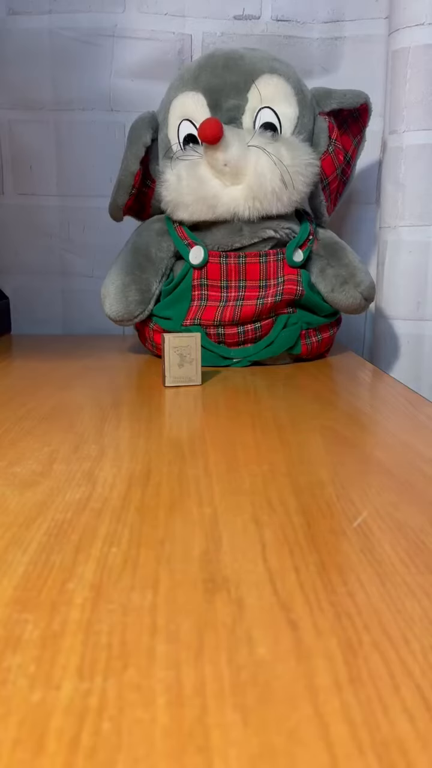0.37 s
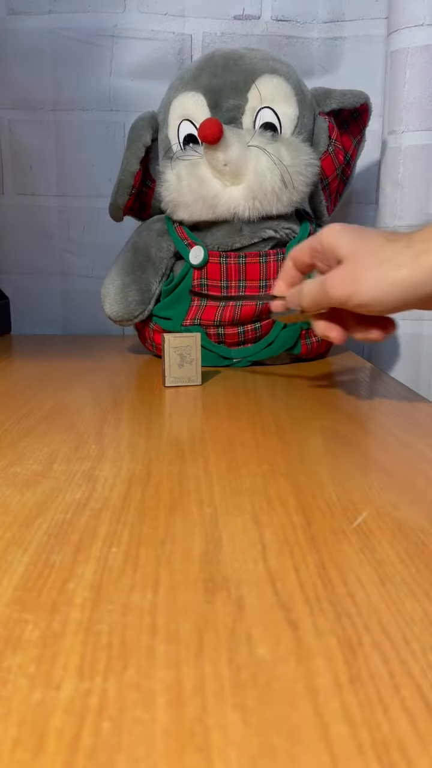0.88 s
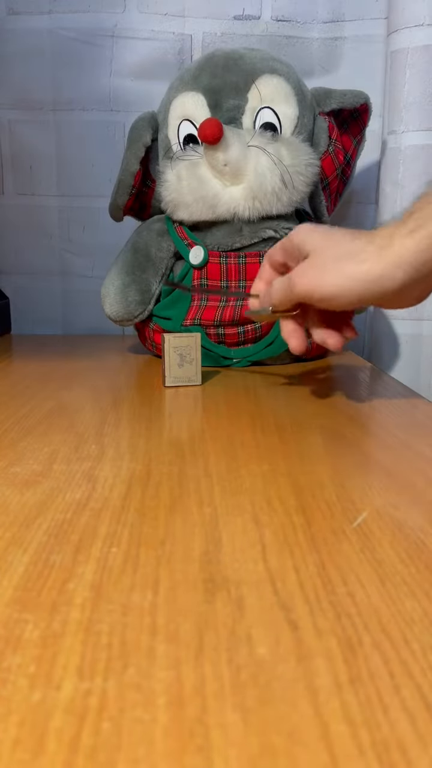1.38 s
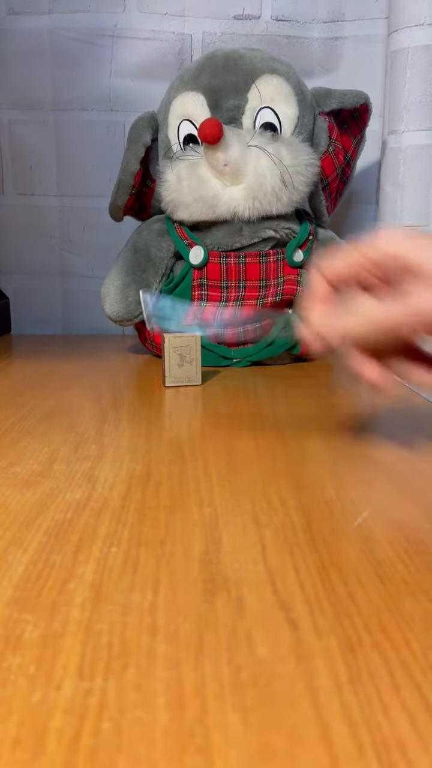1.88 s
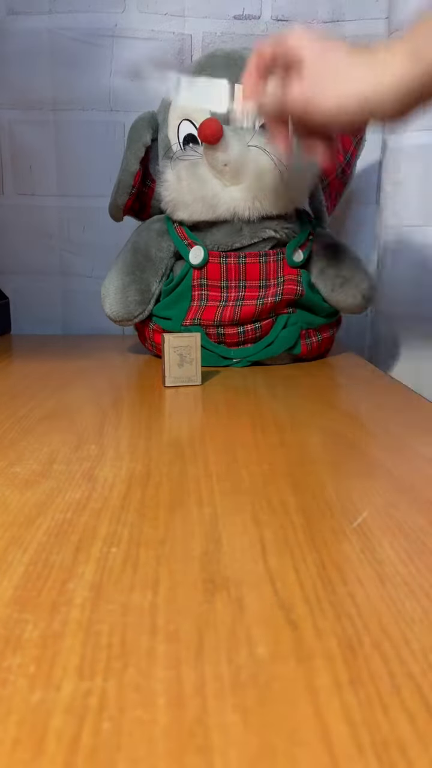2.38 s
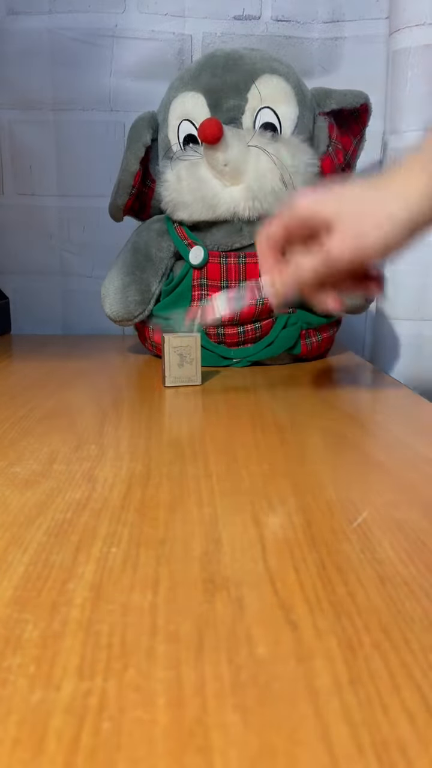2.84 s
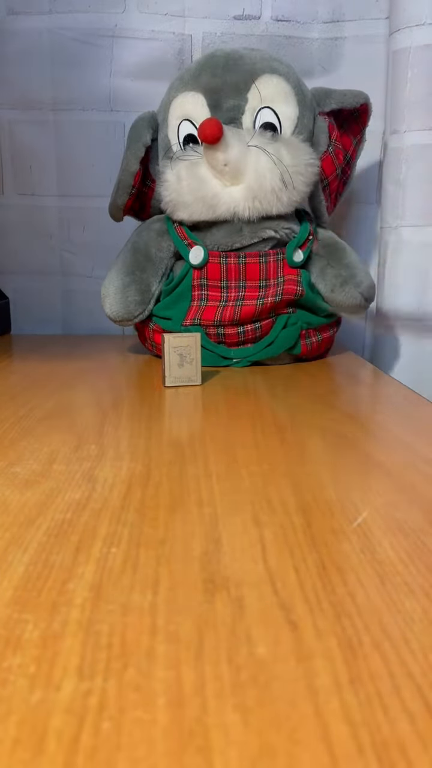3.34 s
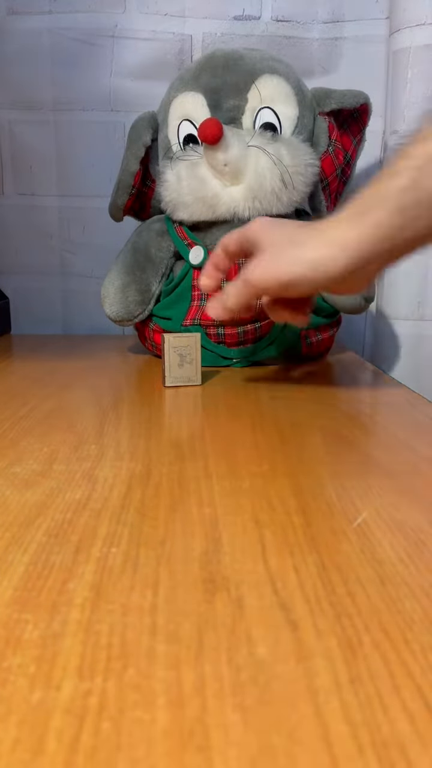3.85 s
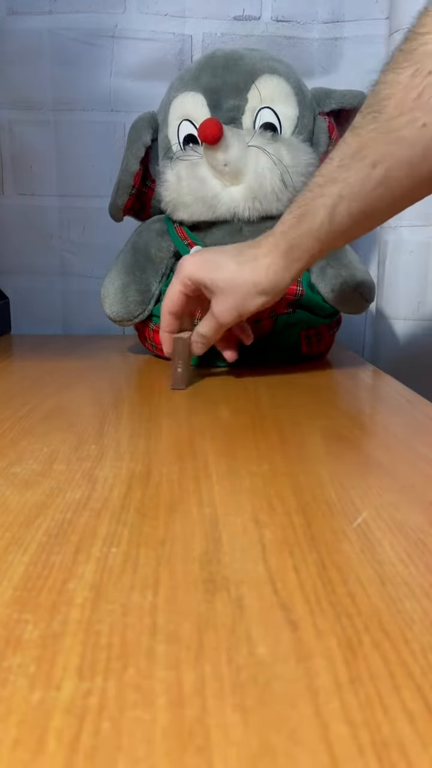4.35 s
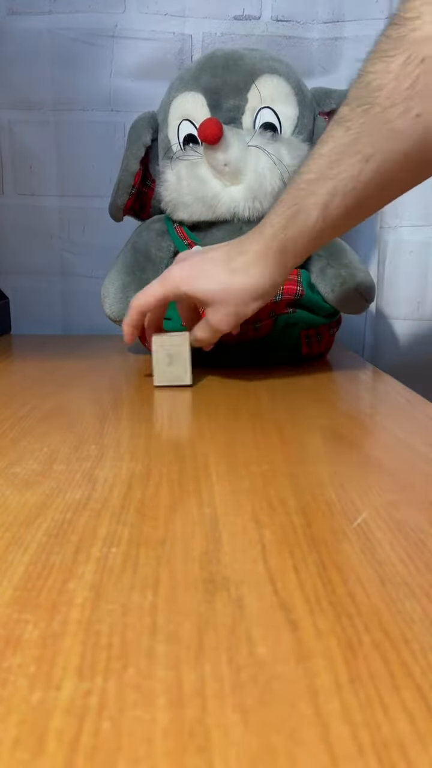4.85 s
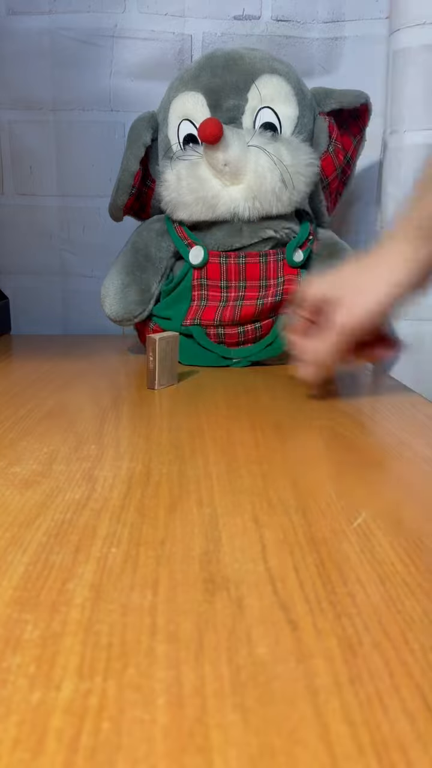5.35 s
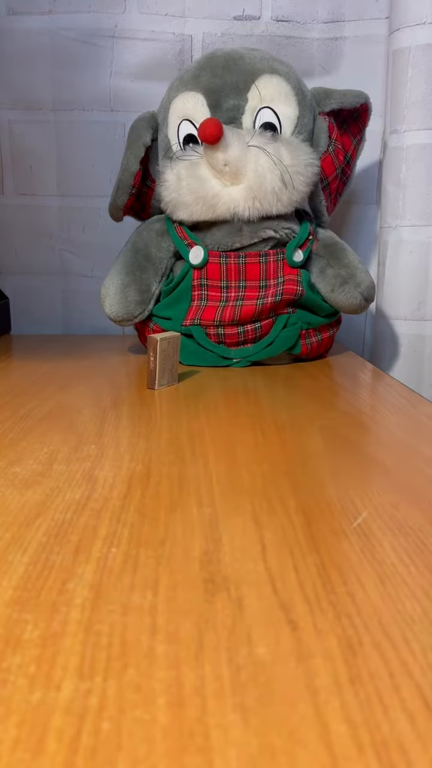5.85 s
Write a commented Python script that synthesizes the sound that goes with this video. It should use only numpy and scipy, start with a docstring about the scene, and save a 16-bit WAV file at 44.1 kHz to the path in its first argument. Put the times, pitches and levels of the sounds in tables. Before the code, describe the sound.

Small hard objects touch a varnished tabletop, heard close and nearly dry in stereo. Muffled arm bumps and faint sleeve rustling surround separate sharp clicks with short woody ringing. The loudest are around two and four seconds. A small block is then knocked, scuffed and slid round, set down with faint clicks and a last low tap. Steady quiet low hum and room noise lie beneath.

```python
"""Small hard objects tapped, dropped and slid by hand on a wooden tabletop in a quiet room, near a phone.
Taps: falling click, ringing wood modes, noise crackle and treble, dull knock, tabletop boom.
Slides: unevenly gated noise through the wood modes; scuffs: noise in one resonance; thuds: boom alone.
Sleeve: fluctuating filtered noise. Background: wavering mains lines over patchy room noise."""
import sys
import numpy as np
from scipy import signal
from scipy.fft import rfft, irfft, next_fast_len
from scipy.io import wavfile
from scipy.ndimage import uniform_filter1d, map_coordinates

SR = 44100
rng = np.random.default_rng(int(sys.argv[2]) if len(sys.argv) > 2 else 0)


def elevation(decibels):
    """Turn decibel levels (scalar or array-like) into linear amplitude ratios."""
    levels = np.asarray(decibels, float)
    return 10 ** (levels / 20)


def inscribe(sig):
    """Save sig as 16-bit PCM at rate SR to the path in sys.argv[1].

    A 1-D sig is mono; a 2-D sig holds one channel per row.
    Samples are clipped to [-1, 1] before scaling.
    """
    pcm = np.round(np.clip(np.atleast_2d(sig).T, -1, 1) * 32767)
    wavfile.write(sys.argv[1], SR, pcm.astype(np.int16))


N = 274213


def unit(x):
    """Scaled to rms 1."""
    return x / np.sqrt(np.mean(x ** 2) + 1e-20)


def along(points, hz):
    """Interpolates (Hz, value) points on a log frequency axis."""
    f, v = np.transpose(points)
    return np.interp(np.log(hz + 1), np.log(f + 1), v)


def wobble(knots_per_s):
    """Smooth random curve."""
    knots = rng.standard_normal(int(N * knots_per_s / SR) + 4)
    return map_coordinates(knots, [np.arange(N) * knots_per_s / SR])


def filtered(x, response):
    """Multiplies the spectrum of x by a complex response of frequency."""
    n = x.shape[-1]
    m = next_fast_len(n + 8192)
    return irfft(rfft(x, m) * response(np.fft.rfftfreq(m, 1 / SR)), m)[..., :n]


# likeness of diffuse sound at the two ports: f/Hz, correlation
PORT_LIKENESS = [(60, 1), (150, .93), (400, 0.26), (1200, 0.29), (3000, 0.1), (4000, 0.17), (4600, 0.88),
                 (11000, 1), (12000, 0.87)]


def spread(pair):
    """Mixes two unrelated signals as mid and side to the likeness of diffuse sound."""
    def mid_side(hz):
        angle = np.arccos(np.clip(along(PORT_LIKENESS, hz), 0, 1)) / 2
        return np.array([np.cos(angle), np.sin(angle)])

    mid, side = filtered(pair, mid_side)
    return np.array([mid + side, mid - side])


def rush(spectrum, n=N):
    """Diffuse stereo noise of rms 1 with the given spectrum."""
    noise = rng.standard_normal((2, n))
    return unit(spread(filtered(noise, lambda hz: elevation(along(spectrum, hz)))))


def add(out, start, sound):
    """Mixes a sound in at a sample."""
    out[:, start:start + sound.shape[1]] += sound


# room decay: f/Hz, t60/s
ROOM_DECAY = [(200, 0.11), (1500, 0.13), (5000, 0.24), (11000, 0.074)]


def room(x):
    """Reverberation: each frequency dies at its own speed; each call draws another answer."""
    predelay_samples = 300
    hz, t, z = signal.stft(rng.standard_normal((2, SR // 3)), SR, nperseg=256)
    decay = elevation(-60 * t / along(ROOM_DECAY, hz)[:, None])
    tail = spread(signal.istft(z * decay, SR, nperseg=256)[1])
    tail = tail / np.linalg.norm(tail[0])
    return signal.fftconvolve(np.pad(x, (predelay_samples, 0))[None], tail, axes=1)[:, :len(x)]


def movements(rows):
    """Gains of overlapping movements that swell and fade: the whole, and the part set by the last column."""
    edge_db = 23.5  # below peak at the start and after the fade time
    start, swell, fade, db, part_db = np.transpose(rows)[:, :, None]
    t = np.arange(N) / SR - start - swell
    gain = elevation(db - edge_db * np.where(t < 0, -t / swell, t / fade)) * (t > -swell)
    part = gain * elevation(part_db)
    return np.sqrt(np.sum(gain ** 2, axis=0)), np.sqrt(np.sum(part ** 2, axis=0))


# mains lines: f/Hz, level/dB rms
MAINS_LINES = [(50, -73.5), (100, -65), (120, -70.5), (200, -70), (250, -70.5), (450, -81.5), (650, -84),
               (750, -89.5)]
# room noise spectrum: f/Hz, relative density/dB
ROOM_NOISE = [(20, -23), (55, -4.5), (130, -8.5), (300, -17), (550, -26.5), (1000, -34), (2000, -37),
              (4000, -42.5), (7000, -44.5), (9500, -42), (11000, -53.5), (12000, -79.5)]


def background():
    """Mains lines wavering in level and phase, over noise whose level varies in time-frequency patches."""
    t = np.arange(N) / SR
    hum = 0
    for hz, db in MAINS_LINES:
        level = np.sqrt(2) * elevation(db + 0.98 * wobble(5.8))
        hum = hum + level * np.sin(2 * np.pi * (hz * t + rng.uniform()) + .5 * wobble(37))
    z = signal.stft(rush(ROOM_NOISE), nperseg=1024)[2]
    patches = rng.standard_normal(z.shape[1:])
    for axis in (0, 1):
        patches = uniform_filter1d(patches, size=5, axis=axis)
    noise = signal.istft(z * elevation(3 * unit(patches)), nperseg=1024)[1][:, :N]
    return hum + elevation(-65) * noise


# arm movements: start t/s, swell/s, fade/s, rustle level/dB, body re rustle/dB (before layer gains)
ARM_MOVES = [(-.1, 0.11, 0.23, -82.5, 10), (.15, 0.13, 0.22, -77.5, -22), (.3, 0.087, 0.039, -75.5, -25),
             (.48, 0.071, 0.25, -87.5, 4), (.45, 0.21, 0.22, -112.5, 39.5), (.68, 0.082, 0.1, -83.5, 6),
             (1.3, .09, 0.11, -81, -3), (1.55, 0.074, 0.083, -80, -17), (1.72, 0.091, 0.8, -79.5, 2.5),
             (1.78, 0.15, 0.18, -78.5, 7.5), (3.05, 0.074, 0.072, -79, 0), (3.47, 0.098, 0.034, -61.5, -25),
             (3.56, 0.047, 0.054, -88, 21.5), (3.64, 0.075, 0.088, -76, -2), (6.1, .1, .1, -83, 10.5)]
# cloth rustle spectrum: f/Hz, relative density/dB
CLOTH_SPECTRUM = [(4500, -40.5), (6000, -17), (8000, -5.5), (10000, 7.5), (11000, -10.5), (11800, -41)]
# body spectrum, also of tap crackle, scuffs and rub: f/Hz, relative density/dB
WOOD_SPECTRUM = [(200, -7.5), (450, -8), (1000, 0.5), (2000, 0), (3500, -6.5), (5000, -6.5), (12500, -55)]


def sleeve():
    """Cloth brushes on cloth as the arm moves: treble and body noise under one random fluctuation."""
    treble, body = movements(ARM_MOVES)
    folds = unit(elevation(2.3 * wobble(58)))
    rustle = elevation(12.5) * treble * rush(CLOTH_SPECTRUM)
    return folds * (rustle + elevation(4.0) * body * rush(WOOD_SPECTRUM))


# tabletop modes: f/Hz, level/dB, t60/s
TABLETOP_MODES = [(65.4, -2.5, 0.17), (118, -5, 0.22), (193.1, -1.5, .17), (256, -4.5, .12),
                  (314, -14.5, 0.054), (366, -12.5, 0.081), (415, -17, 0.092), (550, -21, 0.057)]


def boom(t, upper_db, rise_s):
    """Decaying tabletop modes swell together, a little unlike at each port; upper_db weights those above 150 Hz."""
    modes = 0
    for hz, db, t60 in TABLETOP_MODES:
        port_db = rng.normal(0, 1.2, (2, 1))
        mode_db = db + rng.normal(0, 1.5) + port_db + upper_db * (hz > 150)
        modes = modes + elevation(mode_db - 60 * t / t60) * np.sin(2 * np.pi * hz * t)
    return modes * (1 - np.exp(-(t / rise_s) ** 2))


# soft pushes of arm and hand: t/s, level/dB (before layer gain), upper modes/dB
SOFT_PUSHES = [(0.086, -48, -13), (0.362, -55, -19), (0.66, -61, 9), (0.762, -43.5, -31),
               (0.849, -49.5, -15), (1.406, -45.5, -25), (1.588, -45.5, -14), (1.779, -43.5, -7.5),
               (2.369, -56, -0.5), (3.677, -36, -2.5), (4.68, -62, 2)]


def thuds():
    """Soft flesh loads the tabletop slowly: boom alone."""
    out, t = np.zeros((2, N + SR)), np.arange(SR // 3) / SR
    for s, db, upper_db in SOFT_PUSHES:
        add(out, round(s * SR), elevation(db + 4.5) * boom(t, upper_db, rise_s=0.0125))
    return out[:, :N]


# sharp contacts: t/s, level/dB, click f/Hz, treble/dB, boom/dB (levels before layer gains)
CONTACTS = [(1.065, -30.5, 1630, -47, -10.5), (1.2209, -19.5, 1634, -23.5, -12.5),
            (1.291, -49.5, 2420, -26, -20.5), (2.139, -4, 2645, -16, -30), (2.174, -24.5, 2200, -23.5, -17),
            (2.9204, -12, 2230, -16.5, -25.5), (2.926, -23, 2370, -20, -14.5),
            (3.998, -10, 1403, -24.5, -20.5), (4.0026, -4.5, 919, -32, -14.5),
            (4.0127, -10, 1507, -21, -23.5), (4.017, -3.5, 1890, -38.5, -28),
            (4.106, -31, 1504, -22.5, -19), (4.128, -30.5, 1640, -22.5, -30.5),
            (4.39, -21, 1007, -6.5, -14), (4.434, -10.5, 900, -12.5, -19), (4.89, -46, 1870, -18, -9.5),
            (4.93, -40, 2310, -4.5, -24), (5.3881, -28, 2310, -20, 10.5)]
# treble of tap and rub: f/Hz, relative density/dB
FIZZ_SPECTRUM = [(1800, -27.5), (3200, 1), (5000, 1), (7000, -2), (9000, 3.5), (10500, 1.5), (11300, -12.5),
                 (12000, -47.5)]
# dull knock and drag: f/Hz, relative density/dB
DULL_SPECTRUM = [(150, -12.5), (350, 1), (900, -9), (1400, -16), (3000, -62.5)]
# upper modes of the wood: f/Hz, level/dB, t60/s
WOOD_MODES = [(635, -0.5, 0.08), (900, 0.5, 0.12), (944, -1.5, 0.087), (1280, -4, 0.031), (1547, -8, 0.18),
              (1767, -2, 0.054), (1995, -9, 0.12), (2200, -3, 0.045), (2676, -5, 0.019),
              (3261, -11, 0.0063), (4120, -12, 0.029)]


def taps():
    """A falling few-cycle click rings wood modes near its pitch; crackle, late dull knock and boom follow."""
    out, t = np.zeros((2, N + SR)), np.arange(SR // 3) / SR
    mode_hz, mode_db, mode_t60 = np.transpose(WOOD_MODES)[:, :, None]
    for s, db, hz, treble_db, boom_db in CONTACTS:
        def near_db(f):
            return -9 * np.log2(f / hz) ** 2

        # 10 cycles to -60 dB at -26 dB level and -24.5 dB treble; louder or brighter is shorter
        click_t60 = 10 / hz * np.exp(-0.015 * (db + 26) - 0.03 * (treble_db + 24.5))
        fall = hz * (t + 0.0001 * (1 - np.exp(-t / 0.00033)))  # the contact softens as it lets go
        click = elevation(7.5 - 60 * t / click_t60) * np.sin(2 * np.pi * fall) * (1 - np.exp(-t / 0.0004))

        # each blow weights the modes anew
        level_chance, phase_chance = rng.standard_normal((2, 2, len(mode_hz), 1))
        ring_db = mode_db + 2.3 * near_db(mode_hz) + 3.5 * level_chance - 60 * t / mode_t60
        ring = np.sum(elevation(ring_db) * np.sin(2 * np.pi * mode_hz * t + 3.9 * phase_chance), axis=1)

        crackle = filtered(rush(WOOD_SPECTRUM, len(t)), lambda f: elevation(0.27 * near_db(f + 1)))
        crackle = elevation(-60 * t / 0.048) * crackle
        fizz_decay = elevation(-60 * t / 0.027) + elevation(-60 * t / 0.012) + 0.019 * elevation(-60 * t / 0.079)
        fizz = elevation(treble_db - 2.0) * fizz_decay * rush(FIZZ_SPECTRUM, len(t))

        # grows with the boom, falls with click pitch
        knock_db = -9.5 + 0.28 * boom_db - 0.5 * np.log2(hz / 1500)
        knock = elevation(knock_db - 60 * t / .1) * (1 - np.exp(-t / 0.0091)) * rush(DULL_SPECTRUM, len(t))

        wood = (1 - np.exp(-t / 0.00027)) * (elevation(-18) * ring + elevation(-13) * crackle)
        hit = click + wood + fizz + knock + elevation(boom_db - 2.0) * boom(t, 0, rise_s=0.0092)
        add(out, round(s * SR), elevation(db + 2.5) * (hit + elevation(-14.5) * room(hit[0])))
        # faint noise begins 3 ms before the click and dies away
        lead_noise = elevation(-24 - 60 * t / 0.11) * rush(WOOD_SPECTRUM, len(t))
        add(out, round((s - .003) * SR), elevation(db) * lead_noise)
    return out[:, :N]


# pitched scuffs of a dragged edge: t/s, length/s, level/dB (before envelope), f/Hz
EDGE_SCUFFS = [(2.172, .018, -34.5, 2150), (3.579, 0.047, -61.5, 2750), (4.11, .022, -40, 990),
               (4.159, .018, -44, 1840), (4.188, .032, -48.5, 1790), (4.221, .01, -50, 1855),
               (4.262, .012, -52.5, 1800), (4.337, .05, -47, 951)]


def scuffs():
    """A corner drags briefly: friction noise in one resonance, peaking early."""
    out = np.zeros((2, N))
    width_per_hz, onset_power = 0.17, .6
    for s, length_s, db, hz in EDGE_SCUFFS:
        n = round(length_s * SR)
        half_width_hz = hz * width_per_hz / 2
        tone = filtered(rush(WOOD_SPECTRUM, n), lambda f: 1 / (1 + ((f - hz) / half_width_hz) ** 2))
        envelope = np.sin(np.pi * np.linspace(0, 1, n) ** onset_power) ** .5
        add(out, round(s * SR), elevation(db) * envelope * unit(tone))
    return out + elevation(-19.0) * room(out[0])


# sliding strokes: start t/s, swell/s, fade/s, level/dB, treble/dB (levels before layer gains)
SLIDE_STROKES = [(3.79, 0.081, .3, -59, 0.5), (3.97, 0.031, 0.011, -39, -28), (4.04, 0.022, .15, -53, -28),
                 (4.095, .02, 0.24, -47, -6.5), (4.325, .02, .12, -52, -8.5),
                 (4.382, 0.018, 0.11, -27.5, -8), (4.42, 0.022, 0.063, -23, -1),
                 (4.46, 0.037, .04, -30.5, -0.5), (4.79, 0.015, 0.029, -64.5, -16),
                 (4.84, 0.11, 0.12, -58.5, 1.5)]


def wood_response(f):
    """Sum of the wood's resonances, alternating in sign, each as wide as its decay implies."""
    total = 0
    for k, (mode_hz, db, t60) in enumerate(WOOD_MODES):
        damping = 1j * f * np.log(1000) / np.pi / t60
        total = total + (-1) ** k * elevation(db) * damping / (mode_hz ** 2 - f ** 2 + damping)
    return total


def slide():
    """Sliding over varnish: uneven stick and slip, and catches on the grain, excite the wood's modes."""
    catches_per_s = 700
    body, treble = movements(SLIDE_STROKES)
    slips = unit(elevation(1.1 * wobble(50) + 3 * wobble(350)))
    grit = unit(elevation(1.8 * wobble(90) + 2.5 * wobble(600)))
    catch_level = rng.standard_normal(N) * elevation(3.3 * rng.standard_normal(N))
    catches = unit((rng.random(N) < catches_per_s / SR) * catch_level)
    bumps = unit(filtered(catches, lambda f: elevation(along(WOOD_SPECTRUM, f))))
    rub = body * (slips * rush(WOOD_SPECTRUM) + elevation(-2) * bumps)
    ring = filtered(rub, wood_response)
    fizz = grit * treble * rush(FIZZ_SPECTRUM)
    drag = body * rush(DULL_SPECTRUM)
    direct = elevation(0.5) * rub + elevation(6.0) * ring + elevation(4) * fizz + elevation(-7.5) * drag
    return direct + elevation(-19.0) * room(direct[0])


def scene():
    """Table sounds over the steady background."""
    return background() + sleeve() + thuds() + taps() + scuffs() + slide()


# lag of the right port: f/Hz, lag/half cycles
PORT_LAG = [(200, 0), (700, .3), (1150, 1), (1450, 2), (3000, 2.2), (4750, 3), (5100, 3), (5900, 4),
            (6700, 4), (8000, 5), (9700, 5), (11300, 6), (12300, 6.5)]


def turn_ports(x):
    """Turns left against right by a phase that grows with frequency."""
    return filtered(x, lambda hz: np.exp(np.outer([.5j, -.5j], np.pi * along(PORT_LAG, hz))))


def roll_off(x):
    """The treble ends steeply here."""
    return signal.sosfilt(signal.butter(12, 12520, fs=SR, output="sos"), x)


def record(dry):
    """The phone's ports turn the stereo phase; its input saturates softly near full scale."""
    turned = turn_ports(dry)
    mix = turned / (1 + np.abs(turned) ** 6) ** (1 / 6)
    return roll_off(mix)


dry = scene()
out = record(dry)
inscribe(out)
```